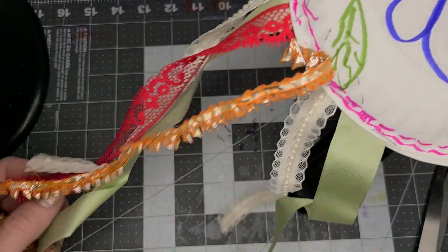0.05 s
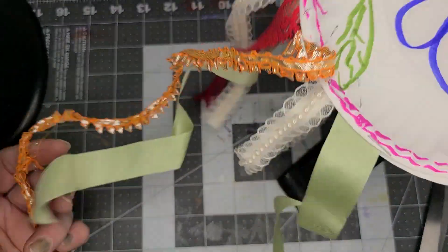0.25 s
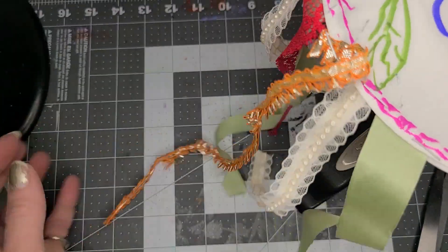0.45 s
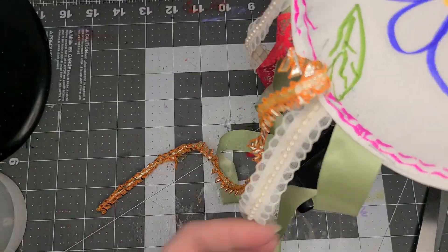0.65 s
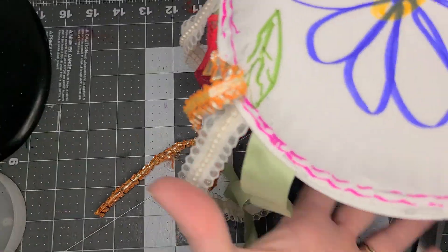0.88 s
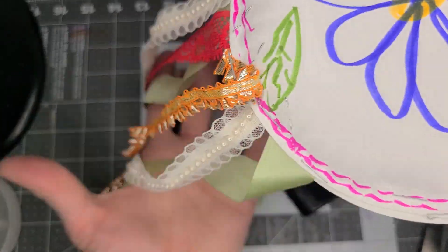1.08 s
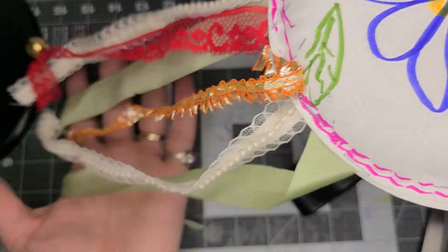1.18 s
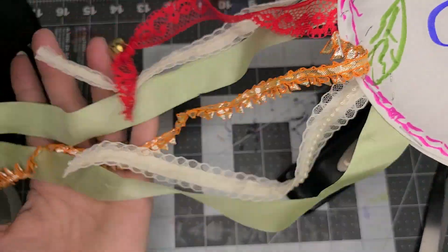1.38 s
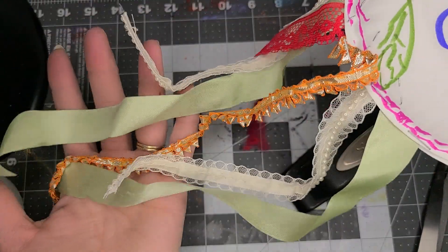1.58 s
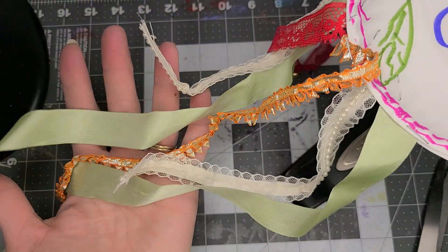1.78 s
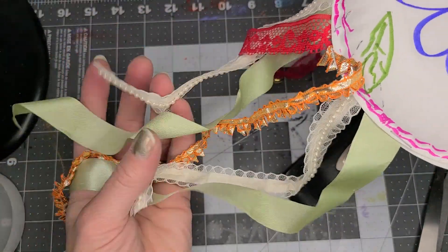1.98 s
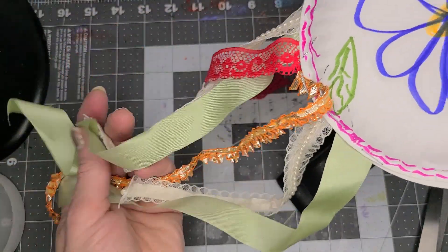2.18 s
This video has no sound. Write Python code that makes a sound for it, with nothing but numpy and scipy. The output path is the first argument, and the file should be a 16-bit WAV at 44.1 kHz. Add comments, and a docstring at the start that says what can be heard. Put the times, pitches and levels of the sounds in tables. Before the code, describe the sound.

Three quick rattling shakes of a paper-plate shaker, followed by faint ribbon rustling.

```python
"""Over the mains hum of a small, quiet room, the ribbons of a paper-plate shaker rustle and squeak faintly.
From 0.2 s the shaker is jerked three times: its filling slides, strikes the paper wall as a clump,
and the loose pieces rattle after it, each impact exciting the modes of the shell.
From 0.8 s ribbons and foil trim rustle and tick over a hand while a few pieces drop inside;
two more squeaks come near the end. All is heard in stereo from close by."""
import sys
import numpy as np
from scipy import signal
from scipy.fft import rfft, irfft, next_fast_len
from scipy.io import wavfile
from scipy.ndimage import uniform_filter1d, map_coordinates

SR = 44100
rng = np.random.default_rng(int(sys.argv[2]) if len(sys.argv) > 2 else 0)


def put_to_file(sound):
    """Save the sound as 16-bit audio at rate SR, in the file named by the first command-line argument."""
    columns = np.atleast_2d(sound).T  # one column per channel
    safe = np.clip(columns, -1, 1)
    whole_steps = np.round(safe * 32767)
    wavfile.write(sys.argv[1], SR, whole_steps.astype(np.int16))


N = 99225
T = np.arange(N) / SR
FFT_SIZE = next_fast_len(N + SR // 2, True)
HZ = np.fft.rfftfreq(FFT_SIZE, 1 / SR)

# Mains hum. Each row: harmonic number, rms level in dB.
HUM_HARMONICS = [(2, -45), (3, -55.5), (4, -62), (5, -74.5), (6, -81), (7, -75), (8, -70), (9, -76),
                 (10, -72.5)]
# Spectra of room noise and ribbon friction. Each row: frequency in Hz, gain in dB.
AIR_SPECTRUM = [(15, -54), (25, -19), (40, -7), (64, -8), (94, -5), (123, -9), (249, -19), (335, -27),
                (476, -26), (700, -26.5), (960, -34), (1250, -21.5), (1750, -35.5), (1980, -25.5),
                (2400, -32), (3500, -30.5), (5000, -38), (6500, -35), (7800, -46.5), (9200, -47.5),
                (11500, -54.5), (16000, -55)]
RIBBON_SPECTRUM = [(150, -21.5), (400, -10.5), (650, -1.5), (900, -3), (1100, 3), (1450, -1.5), (2050, 1),
                   (3100, -2), (4000, -6.5), (6600, -10), (7700, -17.5), (11000, -25.5), (16000, -28)]
# Ribbon strokes. Each row: peak time in seconds, level in dB, rise and fall in seconds per 20 dB,
# relative hiss gain in dB.
RIBBON_STROKES = [(0.018, -59.5, 0.065, 0.09, 4.5), (0.171, -56, 0.093, 0.19, -0.5),
                  (0.315, -59, 0.13, 0.7, 4), (0.49, -55, 0.042, 0.096, 8.5), (0.546, -49, .04, 0.047, -3),
                  (0.79, -53.5, 0.12, 0.14, 1.5), (0.99, -55.5, 0.13, 0.058, 5),
                  (1.11, -54.5, 0.028, 0.027, -1), (1.23, -57, .04, 0.023, -4), (1.37, -64, .1, 0.088, 0),
                  (1.555, -49.5, 0.072, 0.11, -2.5), (1.689, -41, 0.0068, 0.068, -2),
                  (1.717, -36, 0.044, 0.039, -2), (1.78, -51.5, 0.094, .08, 1),
                  (1.819, -39.5, 0.026, 0.023, -5), (1.865, -50.5, 0.11, 0.078, 6),
                  (1.98, -53.5, 0.13, 0.13, -0.5), (2.165, -45, 0.075, 0.13, 0.5),
                  (2.234, -48.5, 0.072, 0.3, 5.5)]
# Ribbon catching on skin. Each row: peak time in seconds, level in dB, pitch in Hz,
# fall in seconds per 20 dB (0 stops it at once).
RIBBON_SQUEAKS = [(0.013, -52.5, 3750, 0), (0.138, -59.5, 3800, .03), (2.134, -43.5, 2500, 0.15),
                  (2.201, -41, 1700, 0.13)]
# Modes of the paper shell. Each row: frequency in Hz, bandwidth in Hz, strength in dB.
SHELL_MODES = [(462, 25, 1.5), (785, 84, 4), (1096, 57, 0), (1377, 53, 8), (1740, 13, -6), (1917, 41, 6),
               (2520, 54, 1.5), (2665, 42, 3.5), (2950, 57, 0.5), (3235, 100, 4.5), (3620, 37, -1),
               (4485, 45, 2)]
# Jerks of the shaker. Each row: knock time in seconds, knock gain in dB, wall pitch in Hz, contact
# cut-off in Hz, relative snap gain in dB, then the rattle's level in dB, delay to its peak in seconds,
# decay in dB per second and tilt in dB per octave.
JERKS = [(0.219, 10.5, 1110, 1470, -23, -21, 0.0084, 762, 0.5),
         (0.4187, 5, 506, 1380, -16, -22.5, 0.018, 680, -1.05),
         (0.6142, 7.5, 538, 2500, -2, -23.5, 0.019, 639, 0.2)]
# Spectra of loose pieces, clump, lone piece and foil. Each row: frequency in Hz, gain in dB.
RATTLE_SPECTRUM = [(100, -27), (300, -17), (480, -12.5), (800, -10.5), (1300, 2.5), (2200, -5), (3300, -4),
                   (4300, -11.5), (6700, -14.5), (7900, -29), (9300, -24.5), (11000, -36), (16000, -43)]
KNOCK_SPECTRUM = [(60, -22), (200, -4), (330, -5), (470, 0), (780, 5.5), (1050, 1.5), (1350, 3.5),
                  (2000, 10.5), (3200, 0), (6000, -1.5), (10000, -7), (16000, -18)]
DROP_SPECTRUM = [(150, -15.5), (600, -3), (1300, 7), (2600, 9.5), (4500, 6), (6600, 3.5), (8000, -6.5),
                 (16000, -24)]
FOIL_SPECTRUM = [(200, -8.5), (600, -1.5), (900, 7), (1300, 9), (2000, 12), (4000, 6.5), (6600, 4.5),
                 (7800, -6.5), (9200, -4.5), (11000, -15), (16000, -17)]
# Lone pieces landing. Each row: start in seconds, gain in dB, ring pitch in Hz, relative ring gain in dB.
PIECE_DROPS = [(0.2685, -20.5, 2600, -6), (0.2804, -19, 2000, -10.5), (0.3190, -26.5, 1940, 4.5),
               (0.35, -32.5, 1260, 7), (0.5450, -28.5, 1250, 15), (0.7748, -36, 1390, 15.5),
               (0.8880, -25, 2000, 8), (1.5230, -36, 1060, 21), (1.5459, -27.5, 1020, 17.5),
               (1.5600, -29.5, 1080, 18), (1.685, -29.5, 1100, 12), (1.713, -22, 1090, 18),
               (1.7200, -20, 3250, 9), (1.8190, -24.5, 616, 18.5), (1.8730, -33, 800, 21),
               (2.1691, -15.5, 1710, 4.5), (2.2225, -15, 2540, 1.5)]
# Contacts of the foil trim. Each row: start in seconds, gain in dB, tilt in dB per octave.
FOIL_TICKS = [(0.389, -36.5, 5), (0.5560, -32.5, 3.5), (0.7220, -36.5, 3), (0.814, -32, 2), (0.87, -48, 9),
              (0.9676, -23.5, 0.5), (0.9850, -30, -1.5), (1.0970, -35, -1), (1.1240, -36, 1),
              (1.1935, -33.5, -2), (1.228, -24, 3), (1.2618, -34, -3.5), (1.3155, -28, 0),
              (1.3585, -33, 2.5), (1.3830, -29.5, -2), (1.4810, -34.5, -5), (1.5810, -31.5, -3.5),
              (1.628, -32, -3.5), (1.7160, -19, -2), (2.0570, -28, -2), (2.0730, -36.5, 0),
              (2.142, -31, -2), (2.171, -25.5, 6.5), (2.2400, -40, 2)]
# Likeness of the channels for room sound and near sound. Each row: frequency in Hz, coherence (0 to 1).
ROOM_COHERENCE = [(25, 0.84), (90, 1), (400, 0.37), (1500, 0.21), (4000, 0.12), (12000, 0.133)]
NEAR_COHERENCE = [(300, 0.83), (1000, 0.79), (2000, 0.73), (4000, 0.61), (12000, 0.317)]
# Stereo balance of the shaker. Each row: frequency in Hz, left minus right level in dB.
LEFT_EXCESS = [(120, -2), (240, -6), (480, -2), (1000, 1.5), (2000, 0), (4000, -5), (8000, -2),
               (15000, -9.5)]
# Stereo phase of the shaker. Each row: frequency in Hz, lead of the left channel in radians.
LEFT_PHASE = [(100, .1), (500, 0.53), (1000, 1.08), (2000, 1.12), (4000, 1.39), (12000, 1.42)]

SCATTER_DB, SCATTER_T60_S = -4.5, 0.029  # echoes inside the shell and off the desk


def amp(db):
    """Amplitude grows tenfold for every 20 dB."""
    return 10 ** (np.asarray(db) / 20)


def curve(points, hz=HZ):
    """Interpolation of (Hz, value) points on a logarithmic frequency axis."""
    freqs, values = np.transpose(points)
    return np.interp(np.log(hz + 1), np.log(freqs + 1), values)


def minimum_phase(db):
    """A causal response follows from its gain curve by folding the cepstrum onto positive time."""
    cepstrum = irfft(np.log(amp(db)), FFT_SIZE)
    cepstrum[1:FFT_SIZE // 2] *= 2
    cepstrum[FFT_SIZE // 2 + 1:] = 0
    return np.exp(rfft(cepstrum))


def tilted(db_per_octave):
    """A power-law spectral slope, pivoting near 3 kHz."""
    return minimum_phase(db_per_octave * np.log2((HZ + 100) / 3000))


def resonance(hz, width_hz):
    """Response of a damped oscillator, with gain 1 at its natural frequency."""
    return 1j * HZ * width_hz / (hz * hz - HZ ** 2 + 1j * HZ * width_hz)


def shell(spectrum, depth):
    """Modal resonance: the paper shell raises narrow peaks on a broad spectrum."""
    modes = [1 + depth * amp(db) * resonance(hz, width) for hz, width, db in SHELL_MODES]
    return minimum_phase(curve(spectrum)) * np.prod(modes, axis=0)


def filtered(x, response):
    """Linear filtering multiplies a spectrum by a frequency response."""
    return irfft(rfft(x, FFT_SIZE) * response, FFT_SIZE)[..., :N]


def stereo(pair, coherence, response):
    """Partial coherence: two independent signals are filtered and mixed as mid and side."""
    angle = np.arccos(np.clip(curve(coherence), -1, 1)) / 2
    mid, side = filtered(pair, response * np.array([np.cos(angle), np.sin(angle)]))
    return np.array([mid + side, mid - side])


def unit_rms(x):
    """Normalisation to a mean power of 1."""
    return x / np.sqrt(np.mean(x ** 2) + 1e-20)


def tail(t60_s, coherence):
    """Exponential decay of stereo noise, with a mean energy of 1 per channel."""
    t = T[:SR // 5]
    angle = np.arccos(np.clip(curve(coherence, np.fft.rfftfreq(len(t), 1 / SR)), -1, 1)) / 2
    noise = rfft(rng.standard_normal((2, len(t))))
    mid, side = irfft(noise * [np.cos(angle), np.sin(angle)])
    envelope = amp(-60 * t / t60_s) * (1 - np.exp(-t / 0.00095))
    pair = np.array([mid + side, mid - side]) * envelope
    return pair * np.sqrt(2) / np.linalg.norm(pair)


def grains(per_s, spread_db, response, bunch_db=2, bunches_per_s=190):
    """Shot noise: tiny random contacts come in bunches and merge into a stereo stream of rms 1."""
    bunches = map_coordinates(rng.standard_normal(int(N * bunches_per_s / SR) + 4), [T * bunches_per_s])
    signs = rng.choice([-1, 1], (2, N))
    sizes = amp(bunch_db * bunches + spread_db * np.clip(rng.standard_normal((2, N)), -2, 2))
    hits = signs * sizes * (rng.random((2, N)) < per_s / SR)
    echoes = signal.fftconvolve(hits, tail(SCATTER_T60_S, NEAR_COHERENCE), axes=1)[:, :N]
    hits = hits + amp(SCATTER_DB) * echoes
    local_rms = np.sqrt(abs(uniform_filter1d(hits ** 2, size=800, axis=1)) + 1e-9)
    return unit_rms(stereo(hits / local_rms, NEAR_COHERENCE, response))


def add_impact(out, start_s, response, crunch_hz=3300, crunch_t60_s=0.0095):
    """Impulse response of one contact: a clean push, a crunch in the treble and near echoes."""
    start = int(np.clip(round(start_s * SR), 0, N - 1))
    push = 1 / (1 + 1j * HZ / crunch_hz)
    crunch = rfft(tail(crunch_t60_s, NEAR_COHERENCE), FFT_SIZE) * (1 - push) ** 2
    echoes = amp(SCATTER_DB) * rfft(tail(SCATTER_T60_S, NEAR_COHERENCE), FFT_SIZE)
    hit = irfft(response * (push + crunch + echoes), FFT_SIZE)[:, :min(SR // 8, N - start)]
    out[:, start:start + hit.shape[1]] += hit


def hum_and_air(mains_hz=60, air_db=-54):
    """A harmonic series on the mains frequency lies over the broadband noise of the room."""
    hum = sum(amp(db) * np.sqrt(2) * np.sin(2 * np.pi * (harmonic * mains_hz * T + rng.random()))
              for harmonic, db in HUM_HARMONICS)
    air = stereo(rng.standard_normal((2, N)), ROOM_COHERENCE, amp(curve(AIR_SPECTRUM)))
    return hum + amp(air_db) * unit_rms(air)


def swell(peak_s, db, rise_s, fall_s):
    """Exponential growth and decay, by 20 dB in rise_s and in fall_s."""
    return amp(db - 20 * np.maximum((peak_s - T) / rise_s, (T - peak_s) / fall_s))


def ribbon_rustle(hiss_above_hz=4540):
    """Sliding friction: ribbons crinkle over skin and paper, and their smooth satin hisses."""
    stream = grains(per_s=1500, spread_db=4.0, response=shell(RIBBON_SPECTRUM, depth=0.43))
    crinkle = filtered(stream, 1 / (1 + (HZ / hiss_above_hz) ** 4))
    crinkle_power, hiss_power = np.zeros((2, N))
    for peak_s, db, rise_s, fall_s, hiss_db in RIBBON_STROKES:  # overlapping strokes add in power
        stroke = swell(peak_s, db, rise_s, fall_s)
        crinkle_power += stroke ** 2
        hiss_power += (stroke * amp(hiss_db)) ** 2
    return np.sqrt(crinkle_power) * crinkle + np.sqrt(hiss_power) * (stream - crinkle)


def ribbon_squeaks(width_hz=340, rise_s=0.0056):
    """Stick-slip friction: a ribbon catches on skin and gives a rough, narrow band of noise."""
    out = np.zeros((2, N))
    for peak_s, db, hz, fall_s in RIBBON_SQUEAKS:
        slips = stereo(rng.standard_normal((2, N)), NEAR_COHERENCE, resonance(hz, width_hz) ** 2)
        out += unit_rms(slips) * swell(peak_s, db, rise_s, fall_s)
    return out


def filling_rattle(slide_db=-39, slide_db_per_s=1200, rise_db_per_s=745,
                   settle_db=-38, settle_db_per_s=141):
    """Random collisions: pieces slide before each knock, shower on the wall after it, then settle."""
    out, body = np.zeros((2, N)), shell(RATTLE_SPECTRUM, depth=0.69)
    for knock_s, *_, db, delay_s, fall_db_per_s, tilt in JERKS:
        since_peak = T - knock_s - delay_s
        slide = amp(slide_db - slide_db_per_s * abs(T - knock_s))
        shower_db = db + np.minimum(rise_db_per_s * since_peak, -fall_db_per_s * since_peak)
        shower = amp(shower_db) * (T > knock_s)
        settle = amp(db + settle_db - settle_db_per_s * abs(since_peak)) * (since_peak > 0)
        collisions = grains(per_s=1200, spread_db=4.5, response=body * tilted(tilt))
        out += (slide + shower + settle) * collisions
    return out


def clump_knocks(wall_db=9, wall_relative_width=0.44, snap_hz=7100, snap_width_hz=2200):
    """Damped impact: the clump of filling thuds on the wall, and the paper snaps as it buckles."""
    out, body = np.zeros((2, N)), shell(KNOCK_SPECTRUM, depth=0.44)
    for knock_s, db, wall_hz, contact_hz, snap_db, *_ in JERKS:
        wall = 1 + amp(wall_db) * resonance(wall_hz, wall_relative_width * wall_hz)
        contact = 1 / (1 + 1j * HZ / contact_hz) ** 2
        snap = amp(snap_db) * resonance(snap_hz, snap_width_hz)
        add_impact(out, knock_s, amp(db) * body * (wall * contact - snap))
    return out


def piece_drops():
    """Free vibration: a lone piece falls, and the spot that it strikes rings briefly."""
    out, body = np.zeros((2, N)), shell(DROP_SPECTRUM, depth=0.28)
    for start_s, db, hz, ring_db in PIECE_DROPS:
        ring = amp(ring_db) * resonance(hz, width_hz=300)
        add_impact(out, start_s, amp(db) * body * (1 + ring))
    return out


def foil_ticks():
    """Brief contacts have broad spectra: stiff foil trim ticks against the plate and the hand."""
    out, body = np.zeros((2, N)), shell(FOIL_SPECTRUM, depth=0.54)
    for start_s, db, tilt in FOIL_TICKS:
        add_impact(out, start_s, amp(db) * body * tilted(tilt))
    return out


def scene(room_db=-26, room_t60_s=0.16):
    """Superposition: the shaker and its faint reverberation, placed by level and phase, over the hum."""
    shaker = clump_knocks() + filling_rattle() + piece_drops()
    shaker = shaker + foil_ticks() + ribbon_rustle() + ribbon_squeaks()
    reverb = amp(room_db) * signal.fftconvolve(shaker, tail(room_t60_s, ROOM_COHERENCE), axes=1)[:, :N]
    sides = np.array([[.5], [-.5]])
    placement = amp(sides * curve(LEFT_EXCESS)) * np.exp(1j * sides * curve(LEFT_PHASE))
    return filtered(shaker + reverb, placement) + hum_and_air()


def record(dry, top_hz=15850):
    """Band limiting: a steep low-pass filter removes the highest treble."""
    return filtered(dry, 1 / np.sqrt(1 + (HZ / top_hz) ** 160))


dry = scene()
out = record(dry)
put_to_file(out)
```